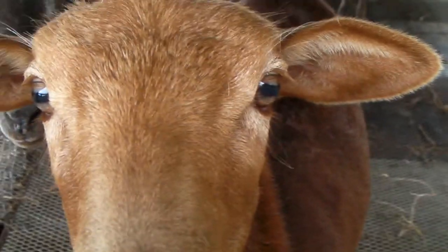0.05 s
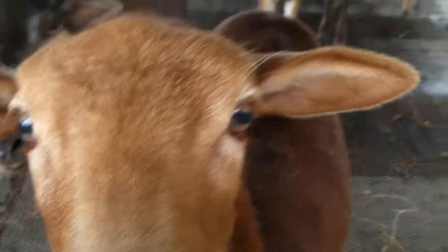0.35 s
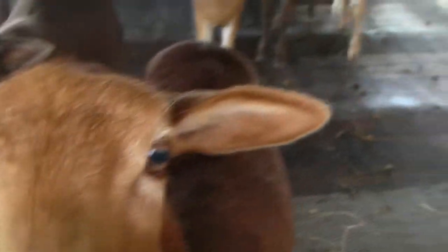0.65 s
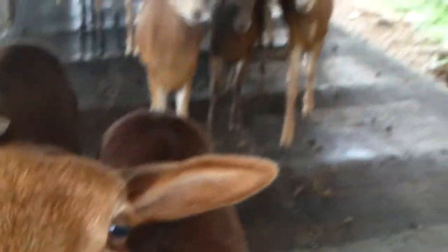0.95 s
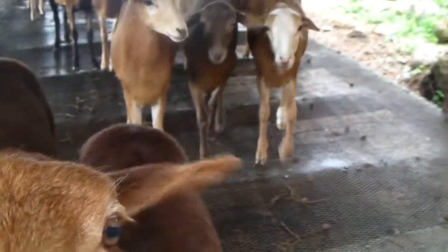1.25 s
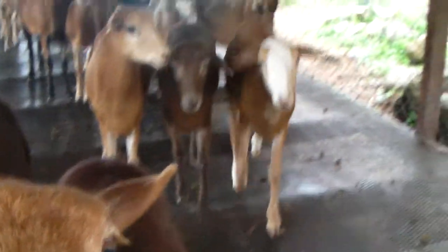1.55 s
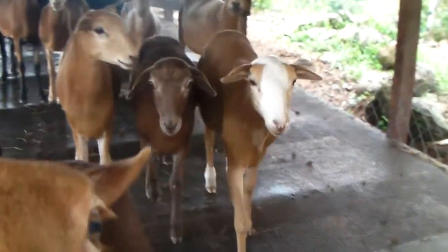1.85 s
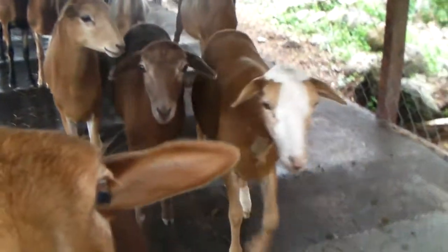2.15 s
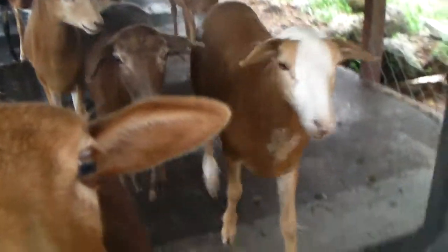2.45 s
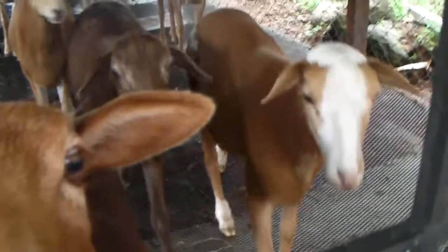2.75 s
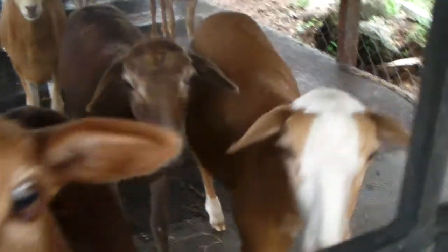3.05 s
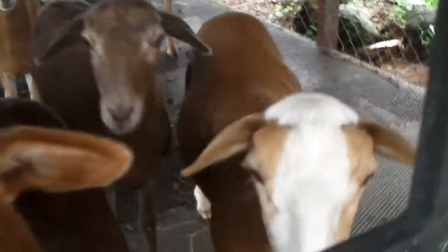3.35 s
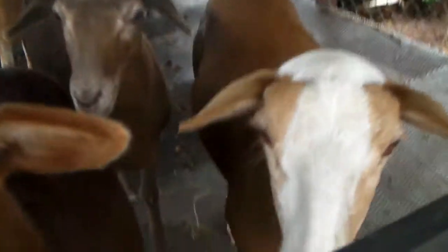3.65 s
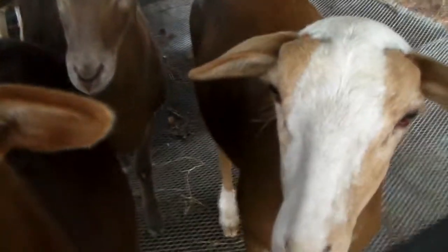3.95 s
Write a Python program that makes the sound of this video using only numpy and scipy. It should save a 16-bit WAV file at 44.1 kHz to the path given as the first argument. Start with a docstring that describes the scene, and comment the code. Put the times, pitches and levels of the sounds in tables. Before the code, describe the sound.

A sheep gives one close, quavering bleat in an open shelter. Before and around it, the flock's hooves scuff and knock lightly on a gritty wire-mesh floor, over a faint, steady outdoor wash.

```python
"""Sheep bleat in an open shelter

One close bleat: vocal-fold pulses ring the mouth as it starts shut, opens into a quavering
"baa" and closes again, with a hum through the nose. Around it the flock shuffles, hooves
scuffing and knocking on a gritty wire-mesh floor, over a steady outdoor wash."""
import sys
import numpy as np
from scipy import signal
from scipy.fft import rfft, irfft
from scipy.io import wavfile

SR = 44100
rng = np.random.default_rng(int(sys.argv[2]) if len(sys.argv) > 2 else 0)


def digitize_waveform(pressure):
    """Quantize a signal to 16-bit integers and store it at the path in sys.argv[1].

    Rows of a 2-D input are taken as channels; values are limited to [-1, 1].
    """
    field = np.atleast_2d(pressure).T
    bounded = np.clip(field, -1, 1)
    quanta = np.round(bounded * 32767).astype(np.int16)
    wavfile.write(sys.argv[1], SR, quanta)


N = 176400
TIME_S = np.arange(N) / SR
BAND_EDGE_HZ = 15950


def amp(db):
    """Decibels to gain."""
    return 10 ** (np.asarray(db) / 20)


def unit_rms(x):
    """Scales to rms 1."""
    return x / np.sqrt(np.mean(x ** 2) + 1e-20)


def at_hz(table, hz):
    """Interpolates a table on a log-frequency axis."""
    freqs, values = np.transpose(table)
    return np.interp(np.log(hz + 1), np.log(freqs + 1), values)


def curves(table):
    """Each column of a time table, sample by sample."""
    times, *columns = np.transpose(table)
    return [np.interp(TIME_S, times, column) for column in columns]


def colour(x, spectrum):
    """Zero-phase filter with the given spectrum."""
    return irfft(rfft(x) * amp(at_hz(spectrum, np.fft.rfftfreq(N, 1 / SR))), N)


def waver(rate_hz):
    """Random drift up to a rate, rms 1."""
    rolloff = 1 + (np.fft.rfftfreq(N, 1 / SR) / rate_hz) ** 4
    return unit_rms(irfft(rfft(rng.standard_normal(N)) / rolloff, N))


# Stereo width: freq_hz, side_gain_db
WIDTH = [(60, 0), (120, -16), (240, -7), (480, -18.5), (950, -15), (1890, -13), (3770, -7.5), (7520, -2),
         (15000, 1.5)]
def stereo(mid, side):
    """Left and right, narrow in the mids and wide in the treble."""
    side = colour(side, WIDTH)
    return np.array([mid + side, mid - side])


def spread(noises, spectrum):
    """Two unrelated noises as a coloured stereo pair, mid at rms 1."""
    mid, side = (colour(noise, spectrum) for noise in noises)
    return stereo(mid, side) / mid.std()


# Wash spectrum: freq_hz, density_db
WASH_SPECTRUM = [(180, -36), (300, -4), (689, -3.5), (885, -9), (1190, -12.5), (1390, -13), (2520, -14.5),
                 (2930, -17), (3190, -18), (6960, -16.5), (7820, -31), (14500, -32), (16000, -23)]
# Wash envelope: time_s, level_db
WASH_ENVELOPE = [(0, -33), (.48, -34), (.58, -41), (.72, -34), (.9, -39), (1.1, -32.5), (1.45, -37.5),
                 (1.7, -38), (2.15, -33.5), (2.35, -38.5), (3.3, -37.5), (3.52, -44.5), (3.85, -36.5),
                 (4, -41.5)]
# Rumble spectrum: freq_hz, density_db
RUMBLE_SPECTRUM = [(20, -36), (45, -24), (70, -3.5), (110, -0.5), (165, 5.5), (215, -2), (270, 5),
                   (400, -25.5)]
def outdoors():
    """A noise wash that swells and sinks over a faint rumble."""
    level_db, = curves(WASH_ENVELOPE)
    wash = spread(rng.standard_normal((2, N)), WASH_SPECTRUM) * amp(level_db + 0.52 * waver(35))
    rumble = spread(rng.standard_normal((2, N)), RUMBLE_SPECTRUM)
    return wash + amp(-53.5) * rumble


# Hoof scuffs: start_s, length_s, body_db, clack_db, sizzle_db, fizz_db
HOOF_SCUFFS = [(0, 0.053, -48, -40, -31, -40), (0.042, 0.029, -26, -30.5, -45, -52),
               (0.183, 0.07, -42.5, -46, -41, -50), (0.318, 0.046, -56, -44.5, -33, -48),
               (0.414, 0.081, -47, -39, -32.5, -44), (0.61, 0.069, -39, -39, -31, -42),
               (0.7, 0.11, -44, -54, -40.5, -52), (0.94, 0.042, -41, -45.5, -48, -54),
               (1.023, 0.024, -38, -37, -32.5, -44), (1.111, 0.031, -39, -42, -40, -59),
               (1.186, 0.071, -34.5, -34.5, -33.5, -44), (1.27, 0.13, -39.5, -42.5, -42, -56),
               (1.441, 0.057, -45, -50, -33.5, -44.5), (1.509, 0.034, -37.5, -39, -45, -62),
               (1.584, 0.13, -35, -38.5, -36.5, -46.5), (1.717, 0.234, -42, -41.5, -37, -44),
               (1.949, 0.0084, -36, -33, -28.5, -34), (2.088, .1, -36, -37.5, -39, -47),
               (2.214, 0.039, -41, -56, -42, -53), (2.968, 0.04, -37, -23.5, -25.5, -36),
               (3.109, 0.055, -29.5, -30, -31, -42), (3.338, 0.05, -74, -46, -39, -49),
               (3.43, 0.034, -60, -52, -39.5, -50), (3.552, 0.015, -42.5, -38, -39, -48),
               (3.769, 0.017, -55, -36.5, -36.5, -43), (3.827, .08, -44, -40, -35.5, -46.5)]
# Hoof knocks: start_s, body_db, clack_db, sizzle_db, fizz_db, mesh_db, t60_s
HOOF_KNOCKS = [(0.034, -23, -24, -21.5, -24, -28, 0.15), (0.253, -36, -29, -27.5, -39, -52, 0.23),
               (0.766, -29, -33, -34, -47, -45, 0.29), (.835, -48, -23.5, -23.5, -33.5, -20.5, 0.096),
               (2.087, -43, -33.5, -27.5, -35, -39, .25), (2.515, -28, -25, -20.5, -27.5, -41, 0.16),
               (3.603, -48, -39.5, -35, -44.5, -62, 0.24), (3.717, -65, -53, -34.5, -43.5, -50, 0.18),
               (3.79, -26.5, -20, -17.5, -31.5, -44, 0.1)]
# Floor spectra (hollow body, clack, wiry sizzle, fine fizz, mesh ring): freq_hz, density_db
BODY = [(100, -36), (280, -20.5), (400, -3.5), (540, -4.5), (700, -3.5), (950, -14.5), (1500, -22),
        (3000, -51)]
CLACK = [(500, -27), (1000, -1.5), (1500, -0.5), (2200, 4.5), (2900, 0.5), (3600, -2.5), (4800, -11),
         (8000, -46)]
SIZZLE = [(1500, -62), (3400, -1.5), (4600, 2.5), (5050, 6.5), (5160, 9), (5300, 6), (5800, 2), (7000, 7.5),
          (7600, -3.5), (8600, -35), (14000, -37)]
FIZZ = [(6000, -44), (8500, -1), (9800, 3.5), (11500, -10), (13000, 3), (14500, -1), (16000, 0.5)]
MESH_RING = [(1200, -54), (1850, -2.5), (2080, 4), (2250, -19), (2400, -2), (2650, -3), (2950, -14),
             (3250, -23), (3460, -4.5), (3700, -7), (4400, -29.5)]
def hooves(knock_rise_s=0.0014, scuff_rise_s=0.013, scuff_t60_s=0.18, grits_per_s=9000):
    """Scuffs and knocks crush grit on the floor; knocks also ring the mesh."""
    contacts = [(contact(start_s, knock_rise_s, 0, t60_s), levels_db)
                for start_s, *levels_db, t60_s in HOOF_KNOCKS]
    contacts += [(contact(start_s, scuff_rise_s, length_s, scuff_t60_s), levels_db)
                 for start_s, length_s, *levels_db in HOOF_SCUFFS]
    drag = amp(0.8 * waver(40))
    floor = np.zeros((2, N))
    for layer, spectrum in enumerate([BODY, CLACK, SIZZLE, FIZZ, MESH_RING]):
        power = sum((envelope * amp(levels_db[layer])) ** 2
                    for envelope, levels_db in contacts if layer < len(levels_db))
        grit = rng.standard_normal((2, N)) * (rng.random(N) < grits_per_s / SR)
        grit *= amp(2 * rng.random(N))
        floor += spread(grit, spectrum) * np.sqrt(power) * drag
    return floor + amp(-10.5) * shelter(floor.mean(0))


def contact(start_s, rise_s, length_s, t60_s):
    """Force of one hoof: linear rise, exponential decay after length_s."""
    age_s = TIME_S - start_s
    return np.clip(age_s / rise_s, 0, 1) * amp(-60 * np.maximum(age_s - length_s, 0) / t60_s)


# Shelter decay: freq_hz, t60_s
SHELTER_DECAY = [(200, 0.17), (1500, 0.11), (8000, 0.06)]
def shelter(x):
    """Short diffuse tail off roof and floor, different at each ear."""
    count = SR // 2
    taps = rng.standard_normal((2, count)) * (rng.random((2, count)) < 0.1) * (np.arange(count) > 200)
    hz, t, frames = signal.stft(taps, SR, nperseg=256)
    decay = amp(-60 * t / at_hz(SHELTER_DECAY, hz)[:, None])
    tail = signal.istft(frames * decay, SR, nperseg=256)[1]
    mid, side = signal.fftconvolve(x[None], tail / np.linalg.norm(tail[0]), axes=1)[:, :N]
    return stereo(mid, side)


# Quavering pitch: time_s, pitch_hz
BLEAT_PITCH = [(2.39, 155.7), (2.422, 173.3), (2.436, 176.7), (2.46, 189.9), (2.476, 195.4), (2.496, 208.3),
               (2.52, 197.2), (2.554, 199), (2.582, 225.8), (2.592, 227.4), (2.614, 208.5), (2.65, 201.3),
               (2.66, 218.6), (2.676, 227.5), (2.704, 197.1), (2.734, 208.8), (2.748, 209.3),
               (2.768, 215.6), (2.788, 205.6), (2.816, 206.3), (2.846, 217.4), (2.894, 210.2),
               (2.914, 206.1), (2.942, 220.4), (2.966, 205.1), (2.976, 200.4), (3.004, 212.1),
               (3.022, 199.4), (3.03, 200), (3.048, 209.8), (3.058, 212.3), (3.078, 198.6), (3.094, 195.6),
               (3.128, 204.7), (3.16, 190.7), (3.196, 193.4), (3.212, 183.1), (3.226, 177.2),
               (3.262, 183.6), (3.31, 176.2)]
# Rasp spectrum: freq_hz, gain_db
RASP_SPECTRUM = [(700, 0), (2000, 2), (4000, 4), (7000, 5), (12000, 9)]
def vocal_folds(jitter=0.012, shimmer=0.2, rasp=0.17):
    """Uneven band-limited pulses, each with a puff of breath; also returns the cycle count."""
    pitch_hz, = curves(BLEAT_PITCH)
    cycles = np.cumsum(pitch_hz * (1 + jitter * waver(98))) / SR
    phase = cycles - np.round(cycles)
    pulses = unit_rms(np.sinc(2 * BAND_EDGE_HZ * phase / pitch_hz) * np.cos(np.pi * phase) ** 2)
    pulses *= 1 + shimmer * waver(70)
    airflow = 0.4 + np.exp(-(cycles % 1) / 0.3)
    puffs = unit_rms(airflow * rng.standard_normal(N))
    return pulses + rasp * colour(puffs, RASP_SPECTRUM), cycles


def gate(table):
    """On between a table's first and last times."""
    return (TIME_S > table[0][0]) & (TIME_S < table[-1][0])


# Hum envelope: time_s, level_db
HUM_ENVELOPE = [(2.37, -46), (2.41, -41), (2.5, -41), (2.55, -35), (2.61, -28.5), (2.66, -53), (2.9, -52),
                (3.11, -51.5), (3.2, -48), (3.285, -33.5), (3.33, -69)]
def nasal_hum(cycles, waver_db=1.5):
    """The fundamental, sounding through the nose."""
    level_db = curves(HUM_ENVELOPE)[0] + waver_db * waver(60)
    return amp(level_db) * np.sqrt(2) * np.sin(2 * np.pi * cycles) * gate(HUM_ENVELOPE)


def tract(x, spectrum, size=4096):
    """Vocal tract as a unit-energy minimum-phase filter: each pulse rings with this spectrum."""
    log_gain = np.log(amp(at_hz(spectrum, abs(np.fft.fftfreq(size, 1 / SR)))))
    response = np.fft.ifft(np.exp(np.conj(signal.hilbert(log_gain)))).real[:size // 2]
    return signal.oaconvolve(x, response / np.linalg.norm(response))[:N]


def formant(x, centre_hz, stage_width_hz=560):
    """A moving mouth resonance: two resonators in series."""
    carrier = np.exp(2j * np.pi * np.cumsum(centre_hz) / SR)
    pole = np.exp(-np.pi * stage_width_hz / SR)
    for _ in range(2):
        x = 2 * (carrier * signal.lfilter([1 - pole], [1, -pole], x / carrier + 1e-18)).real
    return x * np.sqrt(2 * BAND_EDGE_HZ / stage_width_hz / np.pi)  # make-up gain


# Shut-lip spectrum: freq_hz, gain_db
SHUT_SPECTRUM = [(200, -51), (370, 11), (520, -40), (750, 3), (1000, 2.5), (1600, -4.5), (2050, -10),
                 (2400, -11.5), (3000, 9), (3700, -8.5), (5400, -8.5), (7200, -41), (9000, -34),
                 (15000, -32)]
# Main resonance as the lips part and close: time_s, centre_hz
LIP_RESONANCE = [(2.39, 2450), (2.46, 2510), (2.505, 2100), (2.55, 1844), (3.22, 2770), (3.3, 2890)]
def shut_mouth(drive):
    """Nearly shut lips: a muffled tone, a gliding resonance and a whistling one that follows it."""
    lips_hz, = curves(LIP_RESONANCE)
    whistle_hz = 6180 + 0.74 * (lips_hz - lips_hz[0])
    muffled = amp(-5.5) * tract(drive, SHUT_SPECTRUM)
    return muffled + amp(-0.5) * formant(drive, lips_hz) + amp(-8.5) * formant(drive, whistle_hz)


# Open-mouth spectra, relaxed and pressed voice: freq_hz, gain_db
RELAXED_VOWEL = [(200, -23), (410, -17.5), (620, 6.5), (730, -18), (830, -3.5), (1000, -19.5), (1600, -21),
                 (1850, -2), (2200, -15), (2450, -22), (2680, 0.5), (2900, -27), (3200, -17.5),
                 (3800, -27.5), (4500, -26), (6000, -79), (7000, -21.5), (8500, -55), (15000, -47)]
PRESSED_VOWEL = [(200, -29), (430, 0.5), (640, 3), (850, -1.5), (1050, -15), (1500, -3.5), (1900, 4),
                 (2200, -10.5), (2650, 8.5), (2950, -7.5), (3300, -2), (3900, -25), (4550, -12.5),
                 (5800, -32), (6900, -11.5), (8500, -53), (12500, -32.5), (15500, -65)]
def open_mouth(drive, push):
    """The "baa" vowel; each push hardens and brightens it."""
    relaxed = tract(drive * (1 - push), RELAXED_VOWEL)
    pressed = tract(drive * push, PRESSED_VOWEL)
    return relaxed + amp(3.5) * pressed


def bumps(table):
    """Sum of flat-topped bumps, one per row."""
    return sum(height * np.exp(-(2 * (TIME_S - centre_s) / length_s) ** 4)
               for centre_s, length_s, height in table)


# Course of the bleat: time_s, level_db, opening_0_to_1
BLEAT_COURSE = [(2.375, -58, 0.3), (2.395, -28.5, 0.43), (2.44, -25, 0.22), (2.497, -17, 0.13),
                (2.52, -32.5, 0.16), (2.56, -26.5, 0.26), (2.6, -13.5, 0.49), (2.66, -15.5, 0.65),
                (2.71, -16, 0.64), (2.82, -19.5, 0.97), (2.91, -19, 0.98), (2.98, -21, 0.87),
                (3.04, -20, 0.99), (3.115, -20.5, 1), (3.16, -19.5, 0.31), (3.205, -20.5, 0.94),
                (3.245, -27.5, 0.56), (3.283, -27, 0.29), (3.31, -71, 0.45)]
# Pushes of the voice: centre_s, length_s, strength_0_to_1
QUAVERS = [(2.594, .044, 1.), (2.635, .018, .45), (2.676, .044, 1.), (2.734, .024, .7), (2.765, .024, .7),
           (2.868, .064, .7), (2.946, .034, .85), (3.01, .026, .75), (3.06, .032, .75), (3.128, .024, .85),
           (3.194, .028, .9)]
# Falters between quavers: centre_s, length_s, gain_db
CATCHES = [(2.621, 0.036, -6), (2.706, 0.0079, -4), (2.917, 0.048, -1.5), (2.982, 0.024, -3.5),
           (3.035, 0.024, -1), (3.16, 0.013, -10.5)]
def sheep():
    """One bleat: the vocal folds drive the mouth as it opens, quavers and shuts."""
    level_db, opening = curves(BLEAT_COURSE)
    push = np.clip(bumps(QUAVERS), 0, 1)
    source, cycles = vocal_folds()
    drive = source * amp(level_db + bumps(CATCHES)) * gate(BLEAT_COURSE)
    mouth = shut_mouth(drive * (1 - opening)) + open_mouth(drive * opening, push)
    voice = nasal_hum(cycles) - mouth
    return voice + amp(-4) * scatter(voice) + amp(-12) * shelter(voice)


# Reflection off nearby bodies and mesh: freq_hz, gain_db
SCATTER_SPECTRUM = [(500, -37), (1500, -18), (3000, -4.5), (6000, 2.5), (13000, 11)]
def scatter(x, decay_s=0.006):
    """Very early reflections from the flock and the mesh, different at each ear."""
    t = np.arange(SR // 50) / SR
    taps = rng.standard_normal((2, len(t))) * np.exp(-t / decay_s) * (t > 0.0005)
    taps /= np.linalg.norm(taps, axis=1, keepdims=True)
    return signal.oaconvolve(colour(x, SCATTER_SPECTRUM)[None], taps, axes=1)[:, :N]


def scene():
    """The bleat among the shuffling flock."""
    return sheep() + hooves() + outdoors()


def record(dry):
    """A microphone's low-mid dip and thin bass, then the recorder's 8 kHz notch and band limit."""
    dip_hz, low_cut_hz, notch_hz = 273, 65, (7750, 8250)
    x = signal.lfilter(*signal.iirnotch(dip_hz, Q=1.35, fs=SR), dry)
    x = signal.lfilter(*signal.butter(2, low_cut_hz, "high", fs=SR), x)
    band = signal.firwin(767, [*notch_hz, BAND_EDGE_HZ], window=("kaiser", 8), fs=SR, pass_zero=True)
    return signal.oaconvolve(np.clip(x, -1, 1), band[None], "same")


dry = scene()
out = record(dry)
digitize_waveform(out)
```